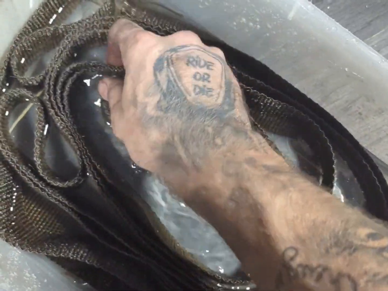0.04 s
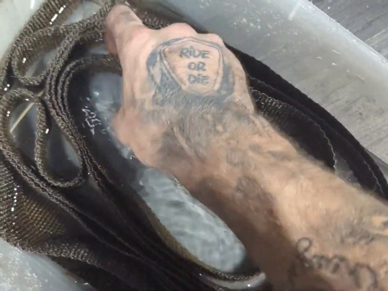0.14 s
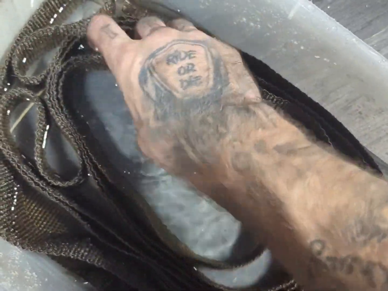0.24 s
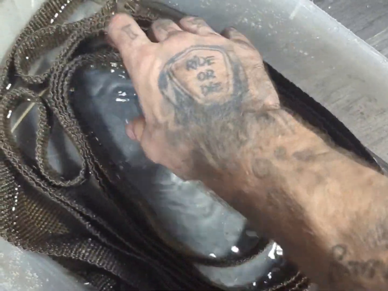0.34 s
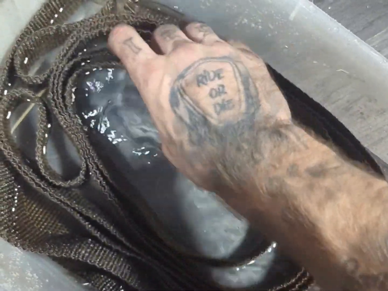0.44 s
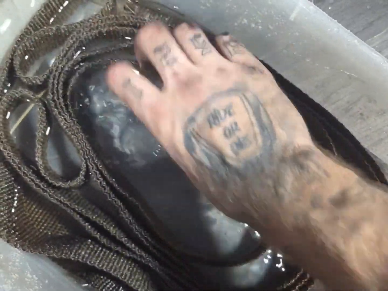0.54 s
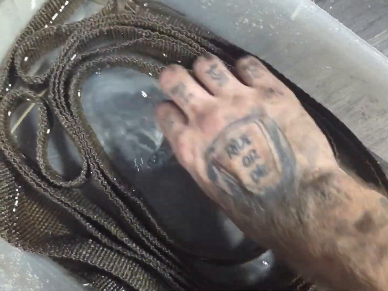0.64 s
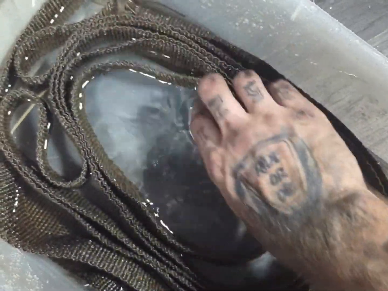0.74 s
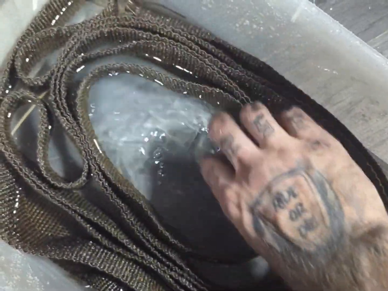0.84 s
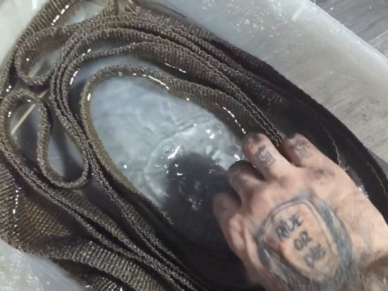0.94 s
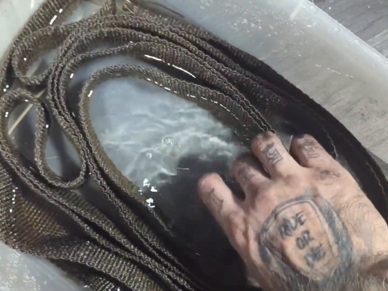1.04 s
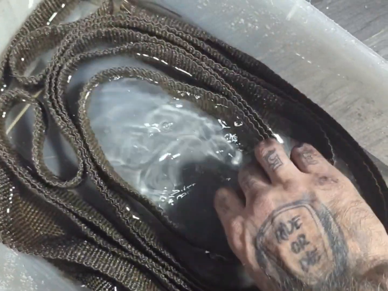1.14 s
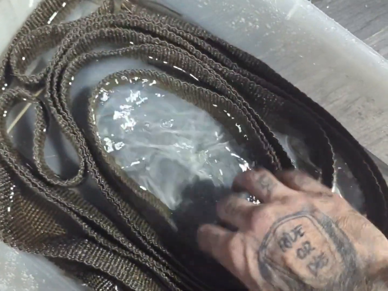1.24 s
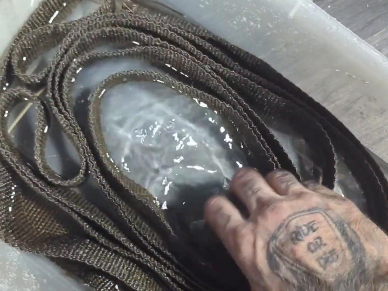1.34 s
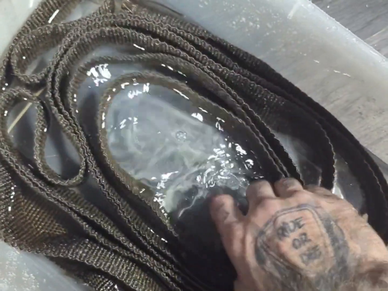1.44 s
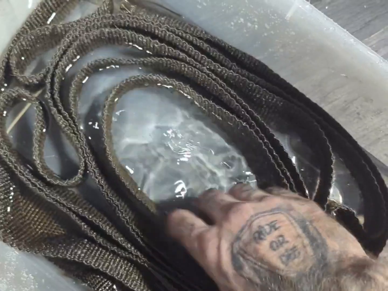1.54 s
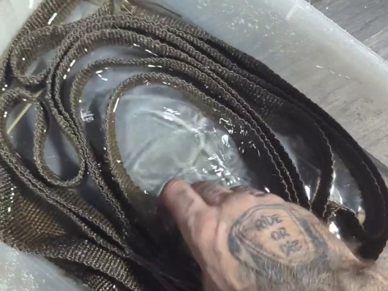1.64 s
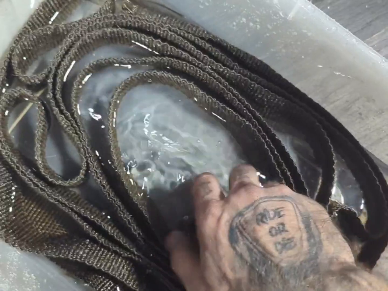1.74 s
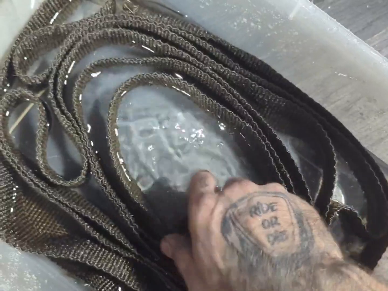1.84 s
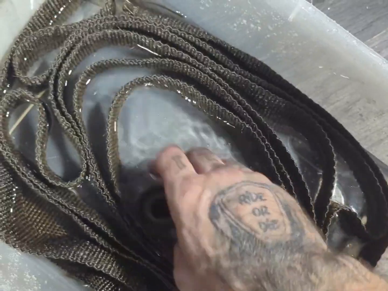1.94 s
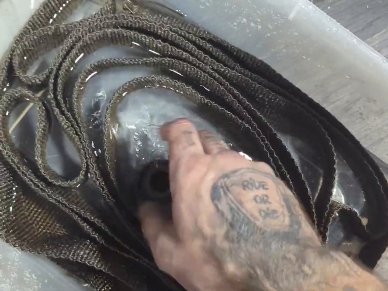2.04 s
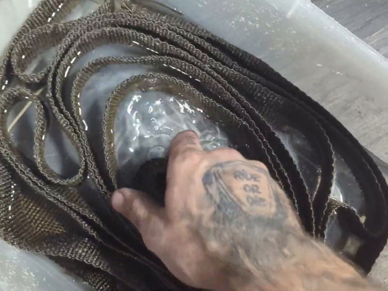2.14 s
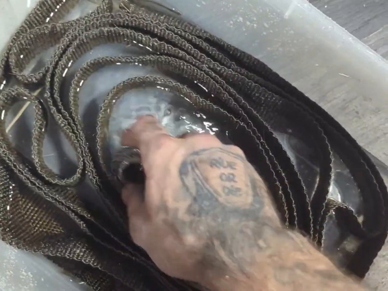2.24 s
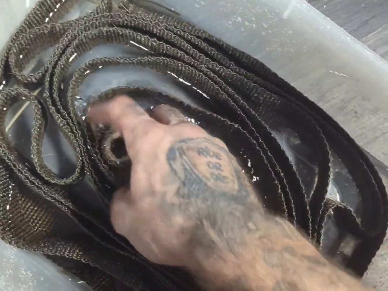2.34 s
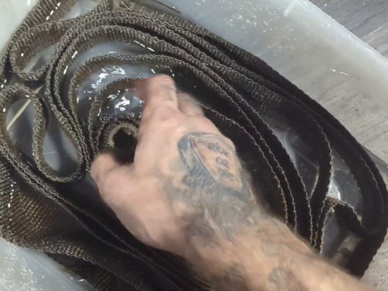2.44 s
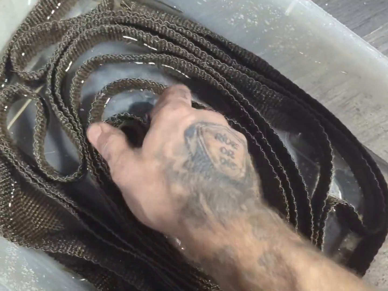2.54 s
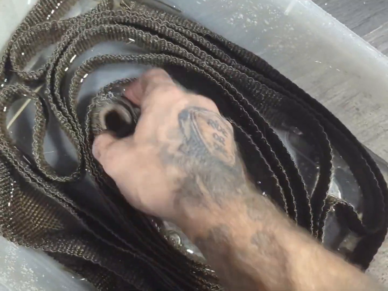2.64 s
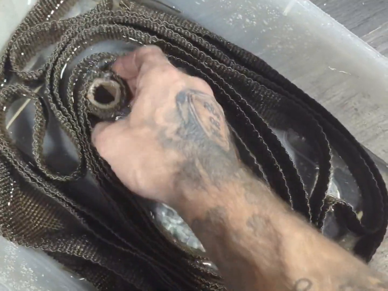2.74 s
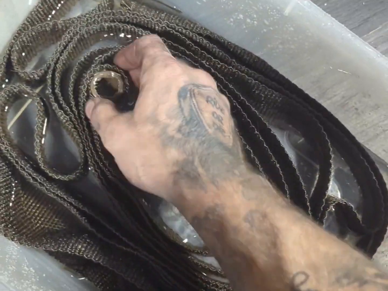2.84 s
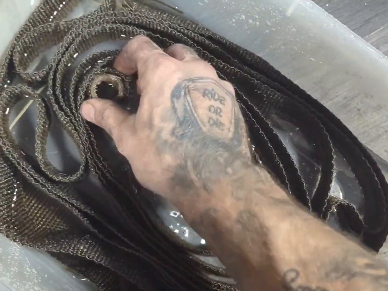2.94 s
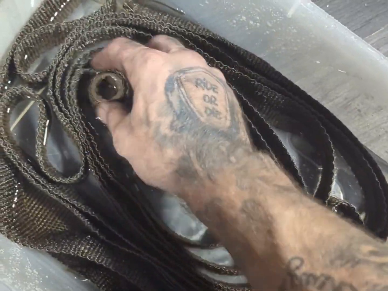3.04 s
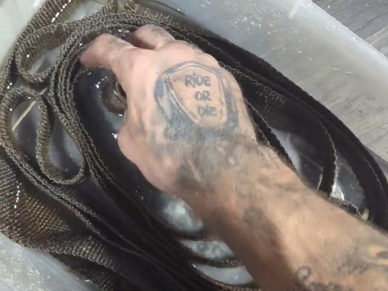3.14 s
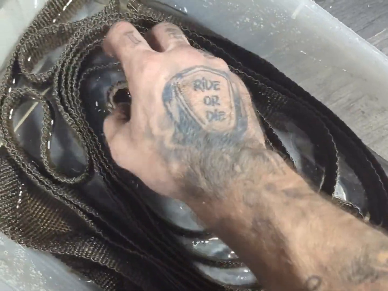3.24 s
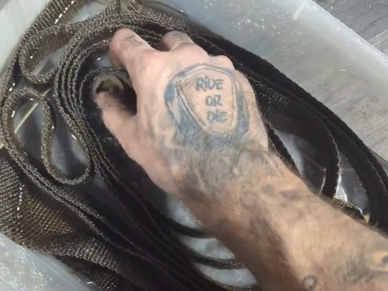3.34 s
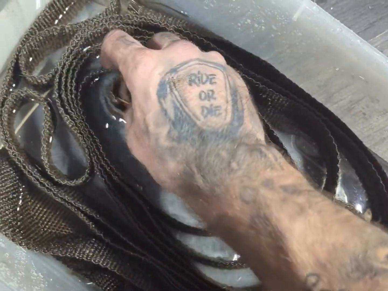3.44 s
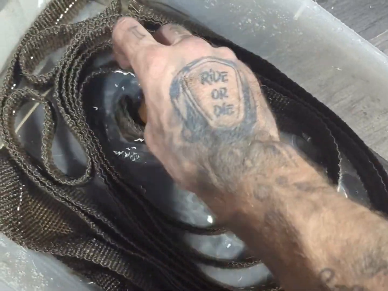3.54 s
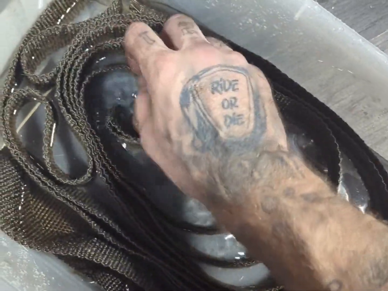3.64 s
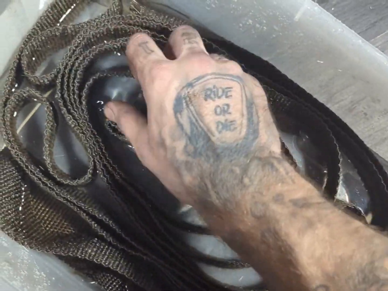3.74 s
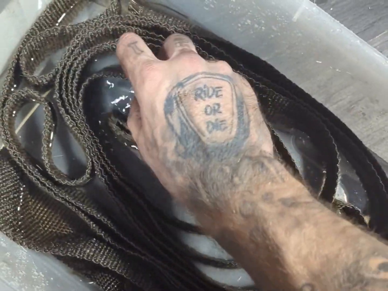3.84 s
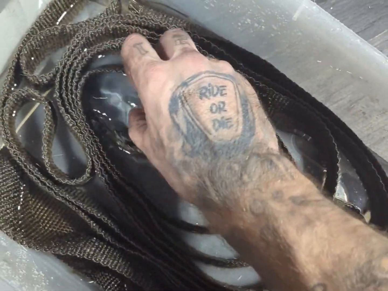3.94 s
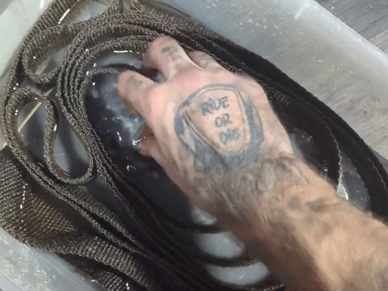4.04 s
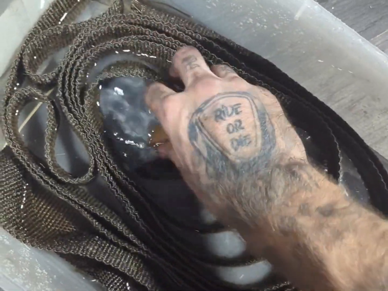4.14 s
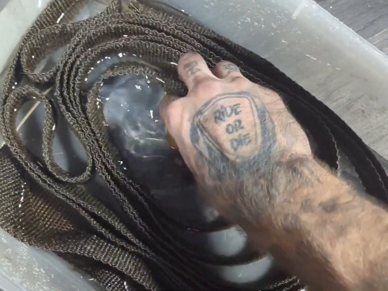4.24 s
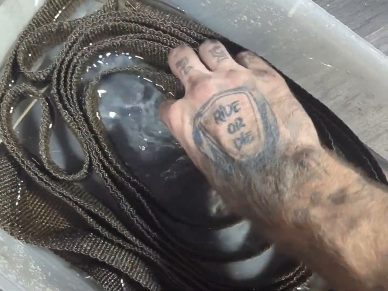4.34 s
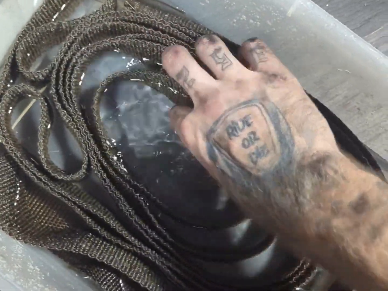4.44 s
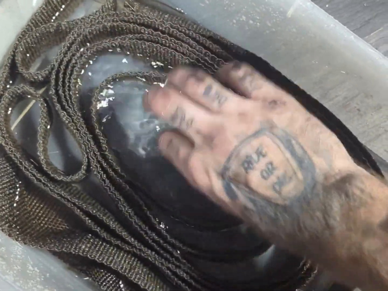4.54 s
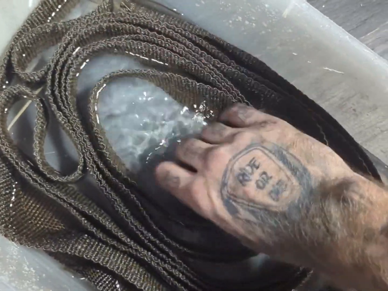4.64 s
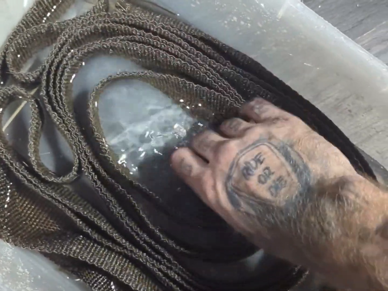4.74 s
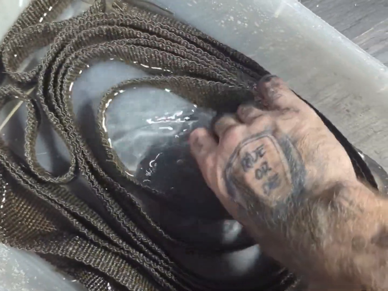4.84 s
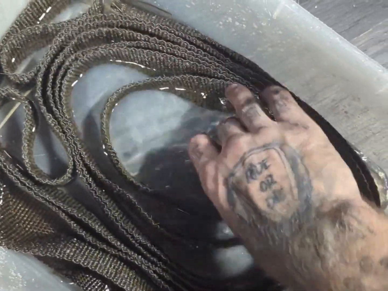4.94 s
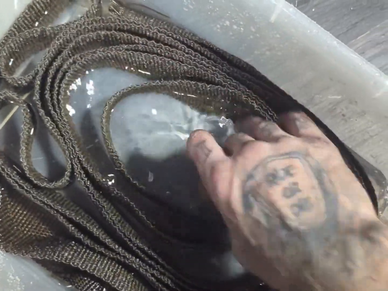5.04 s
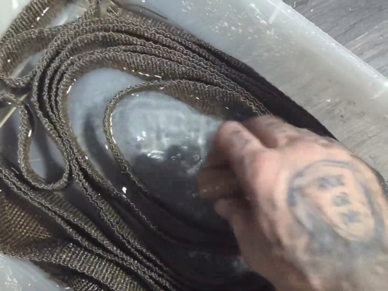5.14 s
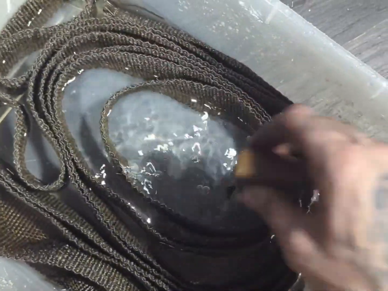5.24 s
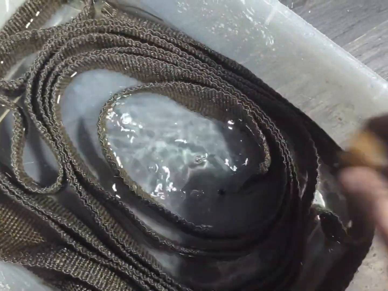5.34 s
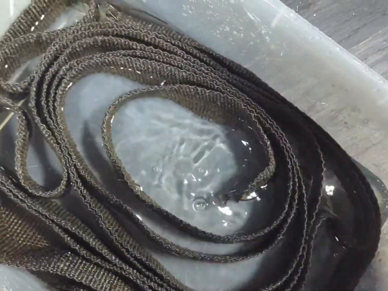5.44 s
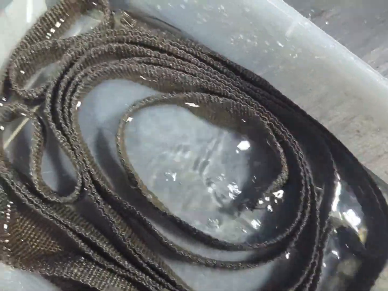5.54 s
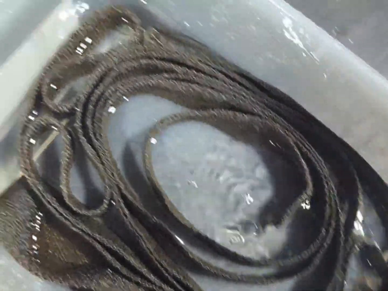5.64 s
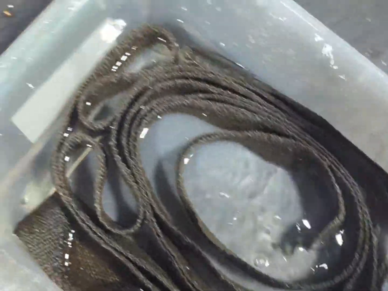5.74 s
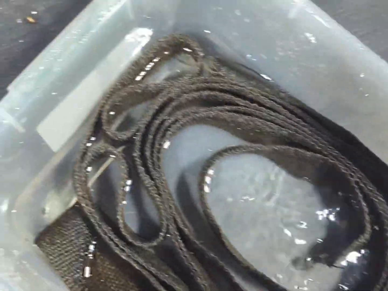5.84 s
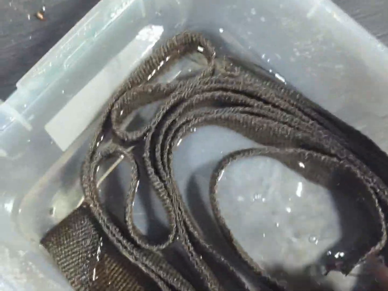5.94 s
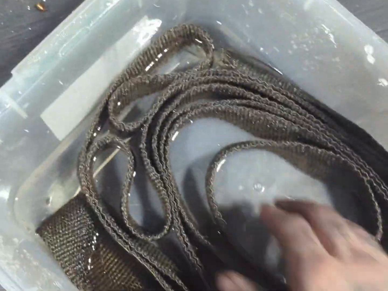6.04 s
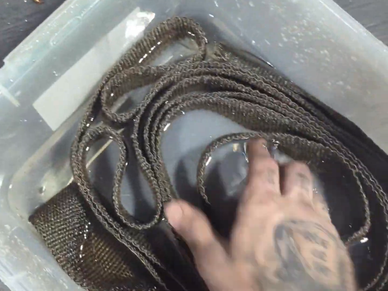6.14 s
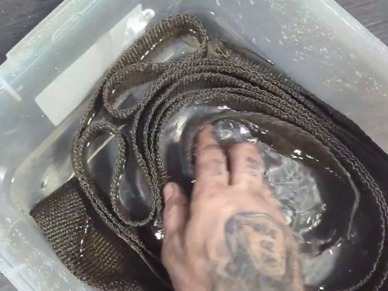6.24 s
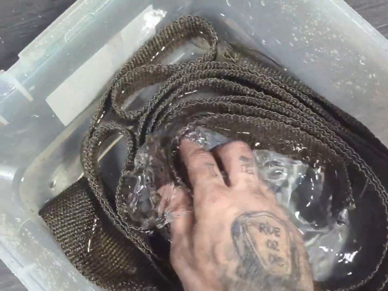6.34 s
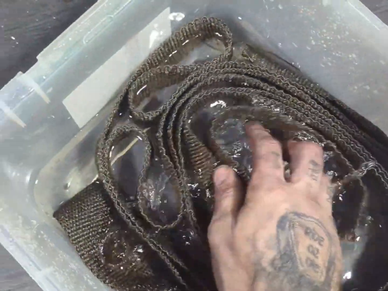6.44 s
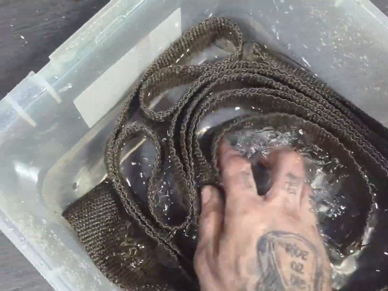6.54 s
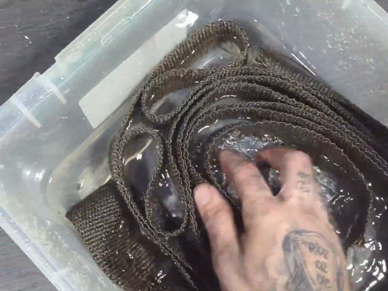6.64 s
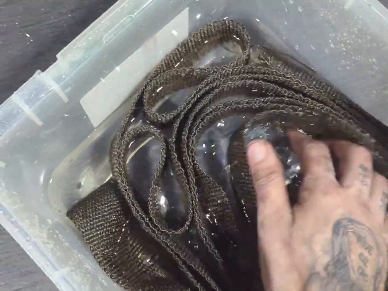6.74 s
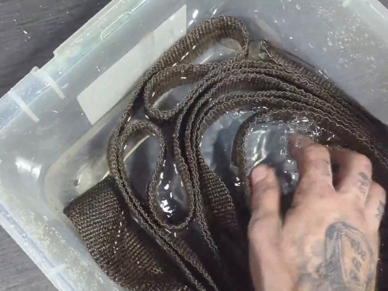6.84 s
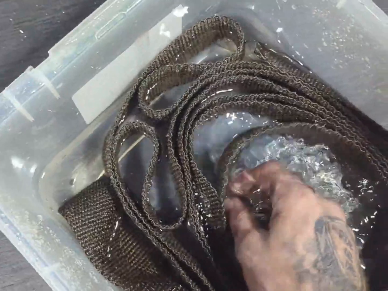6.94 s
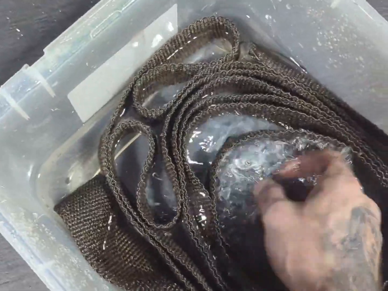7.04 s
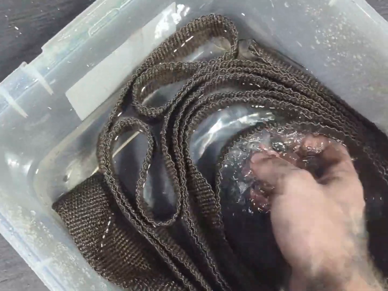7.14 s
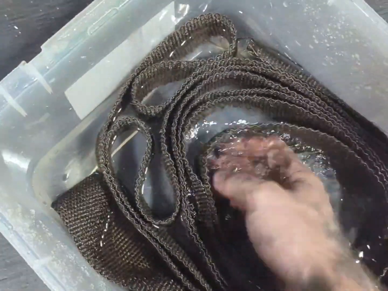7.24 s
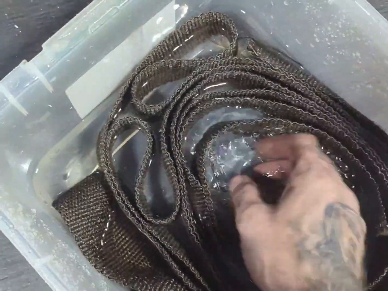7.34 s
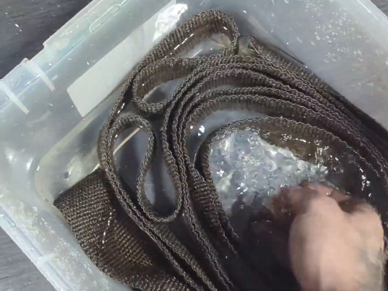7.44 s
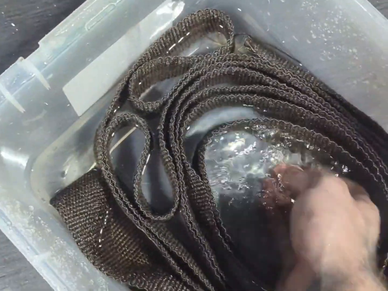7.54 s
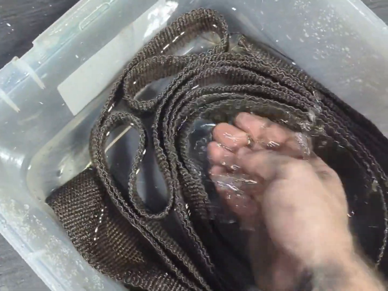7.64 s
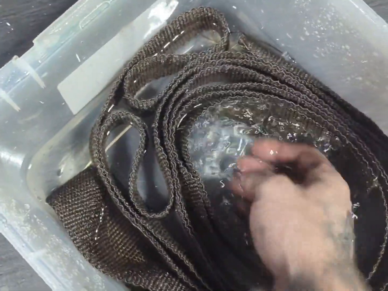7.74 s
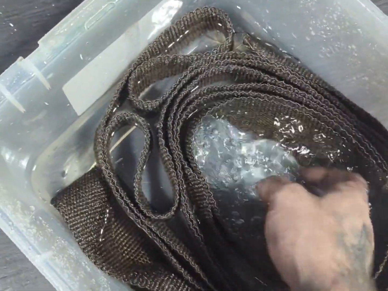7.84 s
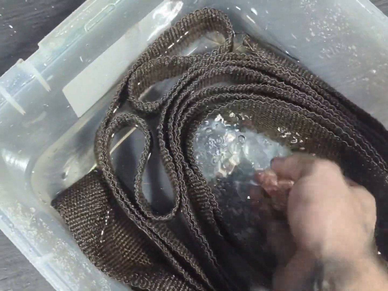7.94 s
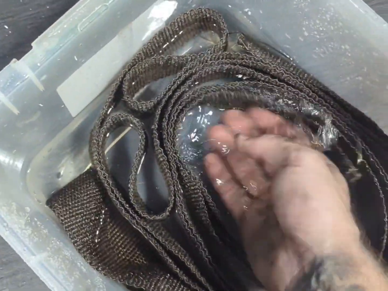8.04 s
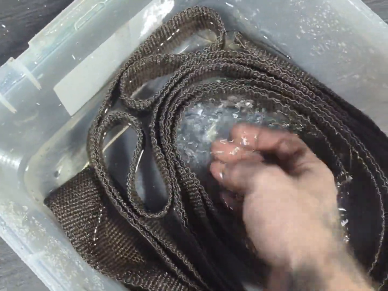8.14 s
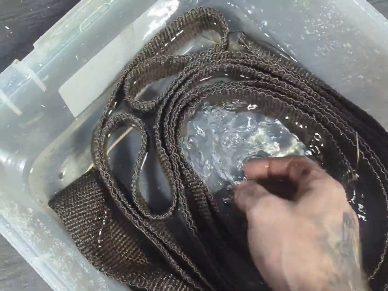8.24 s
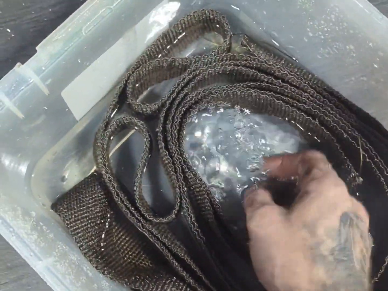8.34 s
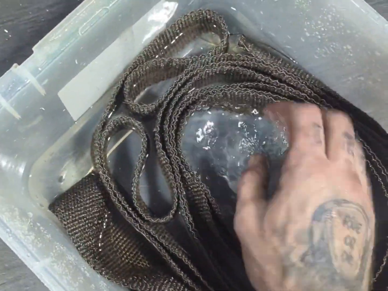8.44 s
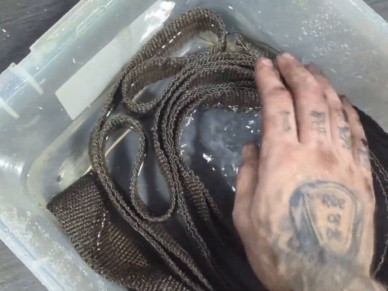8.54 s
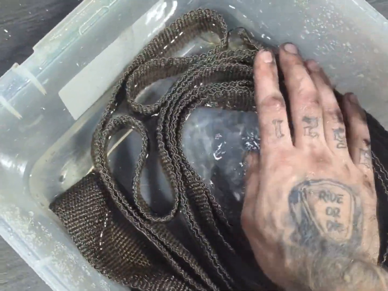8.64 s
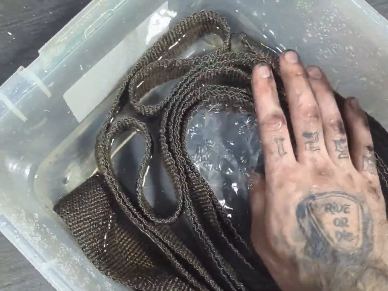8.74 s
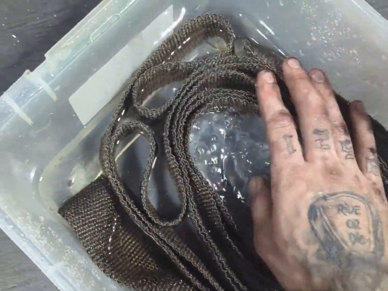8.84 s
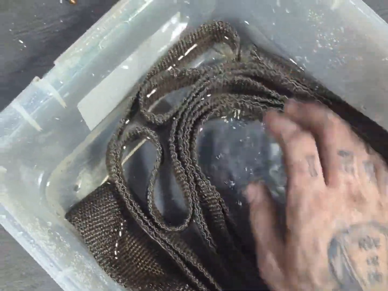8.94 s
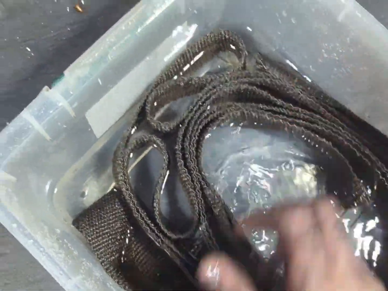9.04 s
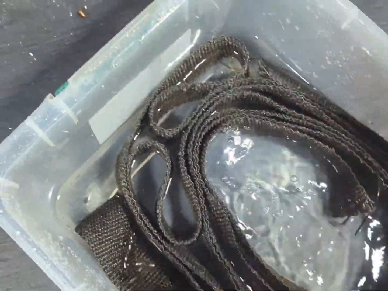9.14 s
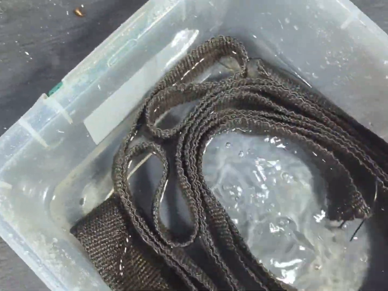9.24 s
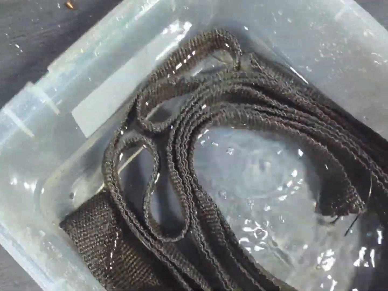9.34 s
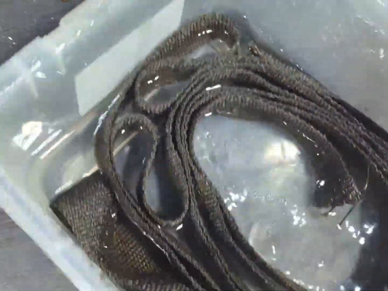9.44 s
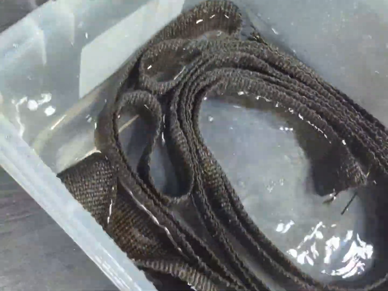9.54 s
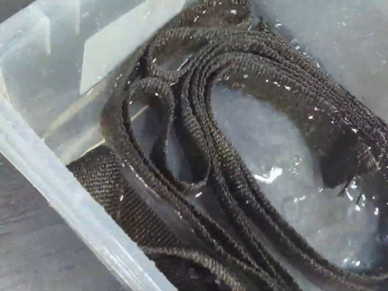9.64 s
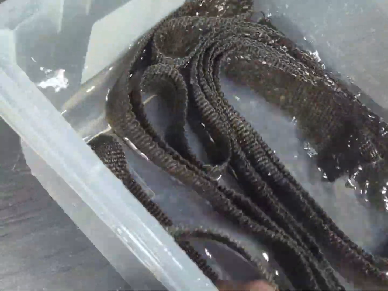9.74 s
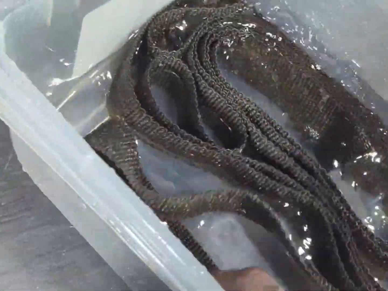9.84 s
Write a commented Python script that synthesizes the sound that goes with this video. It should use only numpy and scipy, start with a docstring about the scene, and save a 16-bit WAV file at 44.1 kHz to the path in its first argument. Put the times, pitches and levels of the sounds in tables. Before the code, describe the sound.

A hand quietly works wet fabric in a water-filled plastic tub, knocks the tub with boomy thuds, then splashes busily with bubbles and droplets before settling.

```python
"""A hand works a coil of soaked woven wrap under water in a plastic tub, close to the microphone.
Squeezes fizz and gurgle as swarms of tiny damped sines on a wash of shaped noise; pushes heave as low noise.
Bumps on the tub boom as filtered thuds with ringing modes, and hard knocks clack on the rim.
Then the fingers splash: bubbles plop as rising damped sines and droplets tick as short bright noise bursts.
Short echoes and resonances stand for the tub walls; behind lie a small room's tail, a low hum and a thin hiss."""
import sys
import numpy as np
from scipy import signal
from scipy.fft import rfft, irfft, next_fast_len
from scipy.io import wavfile
from scipy.ndimage import uniform_filter1d, map_coordinates

SR = 44100
rng = np.random.default_rng(int(sys.argv[2]) if len(sys.argv) > 2 else 0)


def bounce(signal):
    """Save signal as a 16-bit WAV file at the path given by the first command-line argument."""
    frames = np.transpose(np.atleast_2d(signal))
    limited = np.clip(frames, -1, 1)
    pcm = np.round(limited * 32767).astype(np.int16)
    wavfile.write(sys.argv[1], SR, pcm)


N = 437031
TOP_HZ, LOW_HZ = 16100, 35  # band limits of the recorder

# bumps on the tub; softer contact is duller: (time [s], level [dB], upper edge [Hz])
BUMPS = [(1.123, -35, 500), (2.787, -32, 527), (3.546, -37.5, 337), (3.988, -36, 513), (5.009, -35, 534),
         (5.8, -20.5, 487), (5.818, -20.5, 324), (5.926, -19, 854), (5.968, -30, 600), (5.989, -27.5, 69),
         (6.02, -20.5, 573), (6.171, -30, 476), (6.234, -25, 205), (6.32, -33.5, 400), (7.024, -36.5, 507),
         (7.352, -38.5, 300), (7.72, -35, 500), (8.676, -43, 297), (8.901, -37.5, 483), (9.273, -36, 148),
         (9.394, -36.5, 487), (9.801, -33.5, 550)]
# relative spectrum of gurgling water: (frequency [Hz], level [dB])
GURGLE_SPECTRUM = [(350, -33.5), (600, -5.5), (800, -12), (1200, 1.5), (2400, 1), (3000, -0.5), (4500, -14),
                   (7000, -61.5)]
# relative spectrum of spray and droplets: (frequency [Hz], level [dB])
SPRAY_SPECTRUM = [(1500, -13), (3000, 4.5), (4200, -3.5), (5400, -2.5), (7500, 0), (11800, -0.5),
                  (14800, -2.5), (16000, -7)]


def amp(db):
    """Decibels to gain."""
    return 10 ** (np.asarray(db) / 20)


def unit(x):
    """Scale to rms 1."""
    return x / np.sqrt(np.mean(x ** 2) + 1e-20)


def crest(x):
    """Scale so that the channels peak at 1 on average."""
    return x / np.mean(np.abs(x).max(axis=-1))


def along(points, hz):
    """Interpolate (Hz, value) points on a log frequency axis."""
    f, v = np.transpose(points)
    return np.interp(np.log(hz + 1), np.log(f + 1), v)


def wobble(rate):
    """A smooth random curve through rate knots a second."""
    knots = rng.standard_normal(int(N * rate / SR) + 4)
    return map_coordinates(knots, [np.arange(N) * rate / SR])


def filtered(x, response):
    """Multiply the spectrum of x by a response of frequency."""
    n = x.shape[-1]
    m = next_fast_len(n + 8192)
    return irfft(rfft(x, m) * response(np.fft.rfftfreq(m, 1 / SR)), m)[..., :n]


def coloured(x, spectrum):
    """Pass x through a causal filter with this spectrum, then scale to rms 1."""
    levels = along(spectrum, np.fft.rfftfreq(4096, 1 / SR))
    cepstrum = irfft(np.log(amp(levels)))
    # folding the cepstrum gives minimum phase: no sound before its cause
    fold = 1 + np.sign(len(cepstrum) / 2 - np.arange(len(cepstrum)))
    fold[0] = 1
    pulse = irfft(np.exp(rfft(cepstrum * fold)))
    return unit(signal.oaconvolve(x, pulse[None], axes=1)[:, :x.shape[-1]])


def noise(size):
    """Stereo noise, alike in the bass and nearly unrelated in the treble."""
    # likeness of left and right: (frequency [Hz], correlation [0 to 1])
    likeness = [(60, 0.96), (130, 0.94), (290, 0.74), (640, 0.58), (1410, 0.003), (3100, 0.056),
                (15000, 0.24)]
    turn = lambda hz: np.arccos(np.clip(along(likeness, hz), -1, 1)) / 2
    balance = lambda hz: np.array([np.cos(turn(hz)), np.sin(turn(hz))])
    mid, side = filtered(rng.standard_normal((2, size)), balance)
    return np.array([mid + side, mid - side])


def add(track, s, sound, pan_db=0):
    """Mix a sound into the track at time s; positive pan leans left."""
    part = track[:, max(round(s * SR), 0):][:, :sound.shape[-1]]
    part += (sound * amp([[pan_db / 2], [-pan_db / 2]]))[:, :part.shape[1]]


def evened(x, seconds):
    """Hold a swarm near rms 1, so that the stirring sets its strength."""
    power = np.abs(uniform_filter1d(np.mean(x ** 2, axis=0), int(seconds * SR)))
    return x / np.sqrt(power + .002 * power.max())


def swells(rows, attack, t60):
    """A gain from (start s, length s, dB) rows: each rises, holds and dies away; overlaps add in power."""
    clock = np.arange(0, N, 32) / SR  # a coarse clock, interpolated to samples below
    s, length, db = np.transpose(rows)[..., None]
    rise = np.clip((clock - s) / np.reshape(attack, (-1, 1)), 0, 1) ** 2
    each = rise * amp(db - 60 * np.maximum(clock - s - length, 0) / t60)
    return np.interp(np.arange(N) / SR, clock, np.linalg.norm(each, axis=0))


def background(room_db=-60, hiss_db=-69):
    """Steady room noise with a few humming resonances, each a narrow peak in noise, and a thin hiss."""
    # humming resonances: (frequency [Hz], width [Hz], level [dB])
    hums = [(57.5, 17.5, -58), (230.2, 8.1, -71.5), (331, 49, -71), (566.4, 45, -69.5)]
    # relative spectrum of the room noise: (frequency [Hz], level [dB])
    room_spectrum = [(20, -26), (33, -24), (50, 2), (120, -4), (180, -14.5), (320, -14), (450, -23.5),
                     (600, -17.5), (850, -32), (1180, -17.5), (1500, -27.5), (2600, -24.5), (5000, -43.5),
                     (9000, -89)]
    # relative spectrum of the hiss: (frequency [Hz], level [dB])
    hiss_spectrum = [(2000, -42), (4500, -50), (6100, -17), (6600, 9.5), (7050, 16.5), (7500, -2.5),
                     (9500, -7.5), (12000, -23), (16000, -55)]
    hum = 0
    for hz, width, db in hums:
        hum = hum + amp(db) * unit(filtered(noise(N), lambda f: 1 / (1 + (2 * (f - hz) / width) ** 2)))
    room_noise = amp(room_db) * coloured(noise(N), room_spectrum)
    return hum + room_noise + amp(hiss_db) * coloured(noise(N), hiss_spectrum)


def room(x):
    """A small room's tail: decaying noise whose treble dies sooner than its bass."""
    # room decay: (frequency [Hz], t60 [s])
    room_decay = [(100, 0.32), (500, 0.28), (2000, 0.2), (6000, 0.22), (14000, 0.2)]
    hz, t, z = signal.stft(noise(SR // 2), SR, nperseg=256)
    decay = amp(-60 * t / along(room_decay, hz)[:, None])
    tail = signal.istft(z * decay, SR, nperseg=256)[1]
    tail = np.pad(tail / np.linalg.norm(tail[0]), ((0, 0), (SR // 100, 0)))  # the tail starts 10 ms late
    return signal.fftconvolve(x, tail, axes=1)[:, :N]


def hollow(x):
    """The tub's hollow and its plastic walls resonate with whatever sounds inside."""
    # resonances: (frequency [Hz], width [Hz], level over the direct sound [dB])
    resonances = [(769, 20, -3.5), (1347, 11, 2.5), (1375, 11, -51), (1870, 65, -8), (2450, 35, -2.5),
                  (2650, 48, -8)]
    peak = lambda f, c, w: 1j * f * w / (c * c - f * f + 1j * f * w)
    return filtered(x, lambda f: 1 + sum(amp(db) * peak(f, c, w) for c, w, db in resonances))


def walls(x, echo_db, t60):
    """Direct sound plus the quick echoes between the tub walls, drawn anew for each sound."""
    t = np.arange(SR // 16) / SR
    echoes = noise(len(t)) * amp(-60 * t / t60) * (1 - np.exp(-t / 0.0014))
    echoes = unit(echoes) / np.sqrt(len(t))
    return x + amp(echo_db) * signal.fftconvolve(np.atleast_2d(x), echoes, axes=1)[:, :x.shape[-1]]


def sway(heave_db=-3.0, rub_db=-4, slide_db=-1):
    """Pushed water heaves against the tub; the wrap rubs along the wall after bumps and slides on the plastic."""
    # pushes on the water: (start [s], length [s], level before the trim heave_db [dB])
    pushes = [(0.0, .25, -54), (0.45, 0.11, -46), (1.05, .3, -49.5), (2.05, 0.082, -49), (2.7, 0.45, -56),
              (4.03, 0.29, -47), (4.5, 0.11, -48), (5.0, .7, -49), (5.95, 0.54, -44), (7.3, 0.49, -48.5),
              (8.55, 0.23, -56), (9.24, 0.38, -44.5)]
    # slides of the wrap: (start [s], length [s], level before the trim slide_db [dB])
    slides = [(5.92, 0.55, -59), (8.64, 0.17, -57.5), (9.0, .9, -61.5)]
    # relative spectra of heaving, rubbing and sliding: (frequency [Hz], level [dB])
    heave_spectrum = [(25, -35), (40, -5.5), (50, -11.5), (60, 12), (80, -7), (120, -5), (200, -28),
                      (400, -55)]
    rub_spectrum = [(65, -35), (110, -2.5), (230, -14.5), (312, -6.5), (452, -17), (569, -15.5),
                    (1000, -24.5), (1300, -55), (2200, -120)]
    slide_spectrum = [(400, -20), (800, 5), (2500, 2), (4200, -12), (6000, -9.5), (9000, -10.5),
                      (16000, -21)]
    # after a bump the wrap settles along the wall, more strongly after a harder bump
    settle_s = 0.12  # both the rise and the hold
    settling = [(s, settle_s, -57 + 0.46 * (db + 35)) for s, db, _ in BUMPS]
    heave = amp(heave_db) * swells(pushes, attack=0.043, t60=1) * coloured(noise(N), heave_spectrum)
    # the floating wrap always brushes the wall a little
    rubbing = np.hypot(swells(settling, settle_s, t60=6.3), amp(-64.5))
    rub = rubbing * amp(rub_db + 2.8 * wobble(25)) * coloured(noise(N), rub_spectrum)
    sliding = swells(slides, attack=0.036, t60=1) * amp(slide_db + 2.4 * wobble(40))
    return heave + rub + sliding * coloured(noise(N), slide_spectrum)


def tub(thud_t60=0.18, attack=0.0025, ring_db=-1, clack_t60=0.07):
    """Bumps thud and shake the modes of the water-laden tub; hard knocks clack on its rim."""
    # modes: (frequency [Hz], level [dB], t60 [s])
    modes = [(61.2, -11, 0.4), (102.7, 1.5, 0.15), (161.5, 0, 0.23), (204.3, 2, 0.086), (246.6, -8.5, 0.23),
             (317.7, -4.5, 0.22), (385.5, 2, 0.12), (472, -20, 0.095), (549, -7.5, 0.17), (775, -11, 0.14)]
    # hard knocks of the rim: (time [s], level before the 4.5 dB lift [dB])
    knocks = [(5.8, -26.5), (5.926, -25), (5.968, -26.5), (6.018, -25), (9.28, -43), (9.383, -45),
              (9.394, -43)]
    # relative spectra of thud and rim clack: (frequency [Hz], level [dB])
    thud_spectrum = [(45, -18.5), (70, 0.5), (300, 0.5), (570, -6.5), (800, -9.5), (1300, -3.5),
                     (2600, -91.5)]
    rim_spectrum = [(260, -3), (450, 9), (1030, 7), (2500, -1), (3400, -12), (4500, -26.5), (9000, -26.5),
                    (16000, -34)]
    out, t = np.zeros((2, N)), np.arange(SR // 2) / SR
    hz, mode_db, t60 = np.transpose(modes)[..., None]
    for s, db, edge_hz in BUMPS:
        phase = rng.uniform(0, 2 * np.pi, hz.shape)
        detune = 1 + 0.021 * rng.standard_normal(hz.shape)  # the moving water shifts the modes
        strength = amp(mode_db + rng.normal(0, 3.8, hz.shape) - 60 * t / t60)
        ring = np.sum(strength * np.sin(2 * np.pi * hz * detune * t + phase), axis=0)
        thud = coloured(noise(len(t)), thud_spectrum) * amp(-60 * t / thud_t60)
        blow = (crest(thud) + amp(ring_db) * crest(ring)) * (1 - np.exp(-t / attack))
        dulled = signal.sosfilt(signal.butter(3, edge_hz, fs=SR, output="sos"), blow)
        add(out, s, amp(db) * crest(dulled), pan_db=-1.0)
    for s, db in knocks:
        clack = coloured(noise(len(t)) * amp(-60 * t / clack_t60), rim_spectrum)
        add(out, s, amp(db + 4.5) * crest(clack))
    return out


def drops(t60=0.013, attack=0.0014, ring_db=3, sharpness=3.8, pan_db=1.5):
    """Droplets smack on the surface: very short bright bursts, each with a peak around its own pitch."""
    # droplets: (time [s], level [dB], pitch [Hz])
    droplets = [(1.4477, -41, 6670), (2.2113, -35.5, 8100), (2.4638, -37, 4260), (6.3736, -32, 11700),
                (6.4546, -38.5, 11000), (6.5303, -26, 6200), (6.5575, -27.5, 10800), (6.637, -30.5, 3900),
                (6.6873, -28.5, 11600), (6.9116, -35, 3510), (6.9487, -25, 6260), (7.0197, -25, 4700),
                (7.1257, -26.5, 5200), (7.19, -27.5, 6300), (7.3292, -28, 7400), (7.442, -31, 5050),
                (7.5013, -27.5, 6400), (7.537, -31, 11500), (7.8124, -22.5, 6300), (8.077, -36.5, 5270),
                (8.4795, -30, 12900), (8.5917, -35, 8180)]
    out, t = np.zeros((2, N)), np.arange(SR // 12) / SR
    envelope = amp(-60 * t / t60) * (1 - np.exp(-t / attack)) ** 2
    for s, db, hz in droplets:
        ring = unit(filtered(noise(len(t)), lambda f: 1 / (1 + (sharpness * (f / hz - 1)) ** 2)))
        smack = (coloured(noise(len(t)), SPRAY_SPECTRUM) + amp(ring_db) * ring) * envelope
        add(out, s, amp(db) * crest(walls(smack, echo_db=-2.0, t60=0.043)), pan_db)
    return out


def bubbles(rise=3.2, attack=0.00036, snap_db=-8, snap_t60=0.087):
    """Each air pocket pinches off with a wet snap and rings, rising in pitch as it nears the surface."""
    # larger air pockets: (time [s], level before the 1.5 dB lift [dB], starting pitch [Hz],
    # t60 [s], left over right [dB])
    pockets = [(1.471, -43.5, 5230, .018, -3), (1.711, -50, 2100, .034, -2), (1.76, -56, 1890, .05, -6),
               (1.924, -46.5, 1886, 0.089, 2), (2.061, -42.5, 1044, 0.03, -1), (2.394, -49, 994, 0.059, 4),
               (2.433, -47, 1080, .066, -2), (4.748, -44, 1570, 0.026, 6), (4.765, -44.5, 1460, 0.028, -1),
               (4.815, -53, 2800, .036, -2), (4.872, -49.5, 1980, 0.023, 2), (6.394, -35.5, 1220, .01, 1),
               (6.427, -39, 2450, 0.021, -5), (6.5, -42, 1200, 0.046, -14), (6.558, -20, 1810, 0.015, -5),
               (6.583, -26.5, 1406, .049, -2), (6.809, -31.5, 1130, 0.023, -4),
               (6.949, -31, 3340, 0.0062, -2), (6.986, -37, 1800, 0.04, 1), (7.03, -33, 706, 0.014, 3),
               (7.105, -37.5, 2330, 0.087, -8), (7.137, -30, 2640, 0.011, 0), (7.163, -28, 1105, 0.047, -1),
               (7.257, -41, 1715, .071, -3), (7.303, -34, 1203, .034, -9), (7.348, -41.5, 1770, 0.074, 1),
               (7.475, -26, 1690, 0.094, -1.5), (7.572, -26.5, 1985, 0.049, -6),
               (7.575, -38, 1046, 0.044, -2), (7.644, -36.5, 2200, .039, 1), (7.67, -33, 1704, 0.047, -2),
               (7.746, -25, 2220, 0.011, -5.5), (7.748, -26, 730, 0.02, -1.5), (7.809, -29, 716, 0.014, -1),
               (7.812, -17.5, 2390, 0.012, -4), (7.813, -23, 1326, 0.067, 7), (7.869, -36, 2500, 0.025, 2),
               (8.079, -34, 2480, 0.0064, 8), (8.186, -32, 1694, 0.033, 2), (8.204, -30.5, 925, 0.049, 1),
               (8.389, -41, 2100, 0.048, 5), (8.505, -47.5, 1550, 0.085, 2), (8.55, -47, 2280, 0.073, -4),
               (8.599, -43.5, 2380, 0.018, 1)]
    out, t = np.zeros((2, N)), np.arange(SR // 6) / SR
    for s, db, hz, t60, pan_db in pockets:
        glide = 1 + rise * rng.uniform(.5, 1.52) * t / 2
        ring = np.sin(2 * np.pi * hz * t * glide) * amp(-60 * t / t60) * (1 - np.exp(-t / attack))
        snap = crest(coloured(noise(len(t)) * amp(-60 * t / snap_t60), GURGLE_SPECTRUM))
        plop = crest(walls(ring, echo_db=2.5, t60=0.026)) + amp(snap_db) * snap
        add(out, s, amp(db + 1.5) * crest(plop), pan_db)
    return out


def grains(span, rate, pitch_hz, spread, cycles, scatter_db, echo_db, size):
    """A swarm of tiny bubbles, damped rising sines; each reaches each side directly and off two walls."""
    u = rng.random((int(rate * (span[1] - span[0])), 9))
    hz = np.minimum(pitch_hz * 2 ** (spread * (2 * u[:, 1:2] - 1)), TOP_HZ)  # spread in octaves
    turns = hz * np.arange(size) / SR
    life = turns / cycles
    strength = amp(-scatter_db * np.log(np.maximum(u[:, 2:3], .02)))  # a few grains stand out
    waves = strength * np.exp(-life) * np.sin(2 * np.pi * turns * (1 + 0.027 * life))
    start = span[0] + (span[1] - span[0]) * u[:, :1]

    def path(delay):
        """Lay every grain on the track after its own delay in seconds."""
        places = ((start + delay) * SR).astype(int) + np.arange(size)
        return np.bincount(places.ravel(), waves.ravel(), N)[:N]

    sides = np.split(u[:, 3:].T[..., None], 2)
    return np.array([path(.0005 * a) + amp(echo_db) * (path(.004 * b) + path(0.011 * c) / 2)
                     for a, b, c in sides])


def churn(gurgle_gain, spray_gain, wash, plip_db):
    """Stirred water: swarms of mid-sized bubbles, clearer plips and fine crackling spray on a wash of noise."""
    span = 0, N / SR
    swarm = grains(span, rate=380, pitch_hz=1600, spread=1.3, cycles=10,
                   scatter_db=4.5, echo_db=-2, size=1200)
    plips = grains(span, rate=60, pitch_hz=1987, spread=0.59, cycles=13.7,
                   scatter_db=1.5, echo_db=2, size=1400)
    crackle = grains(span, rate=1000, pitch_hz=8080, spread=0.99, cycles=1.6,
                     scatter_db=7.0, echo_db=5.0, size=128)
    gurgle = evened(coloured(swarm, GURGLE_SPECTRUM), seconds=0.02) + amp(plip_db) * unit(plips)
    gurgle = gurgle_gain * (gurgle + wash * coloured(noise(N), GURGLE_SPECTRUM))
    spray = evened(coloured(crackle, SPRAY_SPECTRUM), seconds=0.081)
    spray = spray_gain * (spray + wash * coloured(noise(N), SPRAY_SPECTRUM))
    # gurgle leans right, spray leans left
    return gurgle * amp([[-.8], [.8]]) + spray * amp([[1.5], [-1.5]])


def splashes(gurgle_db=-6.5, spray_db=-4):
    """The fingers break the surface: splashes build to a crest and collapse, over steady stirring."""
    # splashes, before the trims: (time of crest [s], build-up [s], gurgle level [dB], spray over gurgle [dB])
    splash_rows = [(6.39, 0.014, -49, 4), (6.536, 0.11, -37.5, -4.5), (6.652, 0.16, -38, -6),
                   (6.825, 0.038, -36.5, -10), (6.86, 0.057, -45, -6), (7.025, 0.061, -36.5, -7),
                   (7.125, 0.16, -45.5, 2.5), (7.193, 0.063, -35.5, -13), (7.32, 0.15, -56.5, 6),
                   (7.556, 0.089, -39.5, 1.5), (7.712, 0.16, -46, 1.5), (7.818, 0.059, -29.5, -11),
                   (7.93, .06, -51.5, -6), (8.08, 0.025, -45.5, 1), (8.13, 0.06, -42.5, -12),
                   (8.226, .085, -26.5, -6.5), (8.5, .02, -54.5, 0)]
    # fingers staying in the water: (start [s], length [s], level before the trims [dB])
    stir_row = (6.37, 2.5, -62.5)
    s, build, db, bright_db = np.transpose(splash_rows)
    stir = swells([stir_row], attack=0.036, t60=0.36)
    # the thrown water falls back within the t60
    flow = lambda level: np.hypot(swells(np.c_[s - build, build, level], build, t60=.16), stir)
    return churn(amp(gurgle_db) * flow(db), amp(spray_db) * flow(db + bright_db), wash=0.48, plip_db=-6)


def seep(gurgle_db=-8.5, fizz_db=-5, waver_db=2.6):
    """Each squeeze drives air out of the soaked weave, a little unevenly, and the flow dies away after it."""
    # squeezes, before the trims: (start [s], length [s], gurgle level [dB], fizz over gurgle [dB])
    squeezes = [(0.0, 0.39, -73.5, -1.5), (0.69, 0.059, -71, 3), (0.91, 0.18, -76.5, 11.5),
                (1.137, 0.58, -67.5, -0.5), (1.57, 0.2, -62.5, -0.5), (1.911, 0.21, -61, -1),
                (2.15, 0.32, -67.5, 1.5), (2.707, 0.57, -65, -3), (3.277, 0.34, -71, -0.5),
                (4.017, 0.48, -65.5, -22), (4.688, 0.094, -69, 1.5), (4.936, 0.41, -63, -5.5)]
    s, length, db, bright_db = np.transpose(squeezes)
    uneven = amp(waver_db * wobble(10))

    def flow(level, rest_db):
        """Squeezed flow over a resting one: the weave never quite stops seeping."""
        pressed = swells(np.c_[s, length, level], attack=0.063, t60=0.69)
        return np.hypot(uneven * pressed, amp(rest_db))

    gurgle_gain = amp(gurgle_db) * flow(db, rest_db=-76)
    fizz_gain = amp(fizz_db) * flow(db + bright_db, rest_db=-74)
    return churn(gurgle_gain, fizz_gain, wash=1.464, plip_db=-13)


def scene():
    """Water and tub blows, coloured by the hollow and sent into the room, over sway and background."""
    water = hollow(bubbles() + drops() + seep() + splashes())
    blows = hollow(tub())
    tails = amp(-10.0) * room(water) + amp(-6.5) * room(blows)
    return water + blows + tails + sway() + background()


def record(dry):
    """The recorder cuts the deepest rumble and keeps nothing above its band limit."""
    return filtered(dry, lambda hz: (hz < TOP_HZ) * hz ** 8 / np.sqrt(hz ** 16 + LOW_HZ ** 16))


dry = scene()
out = record(dry)
bounce(out)
```